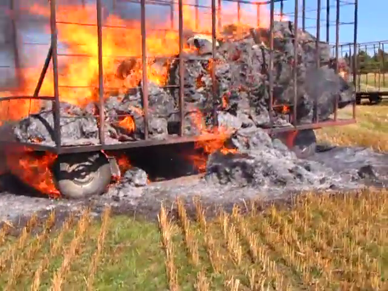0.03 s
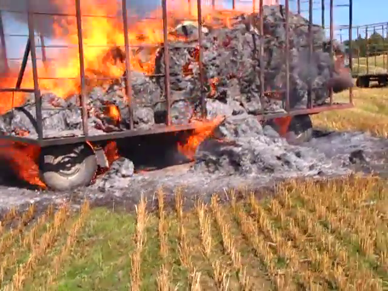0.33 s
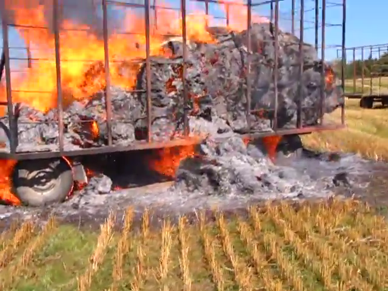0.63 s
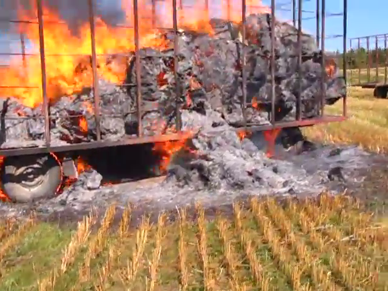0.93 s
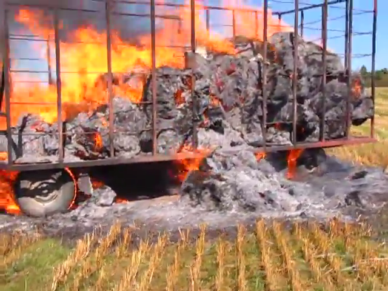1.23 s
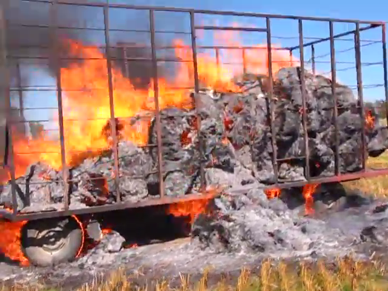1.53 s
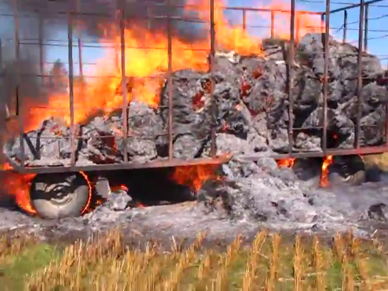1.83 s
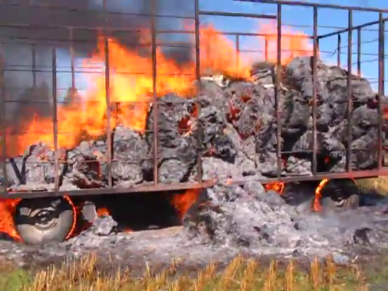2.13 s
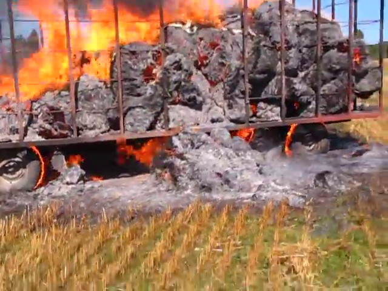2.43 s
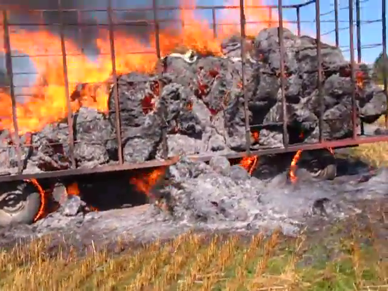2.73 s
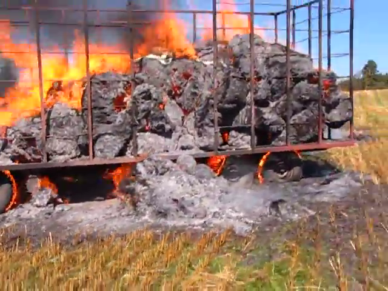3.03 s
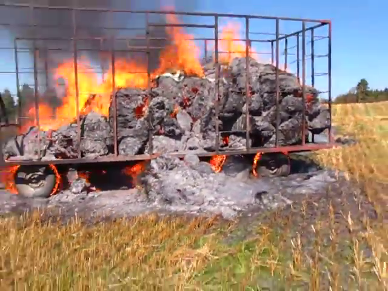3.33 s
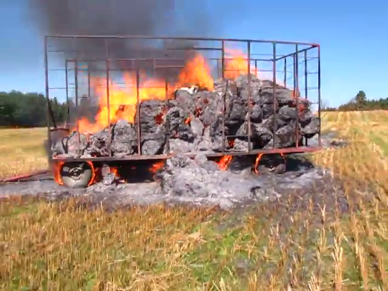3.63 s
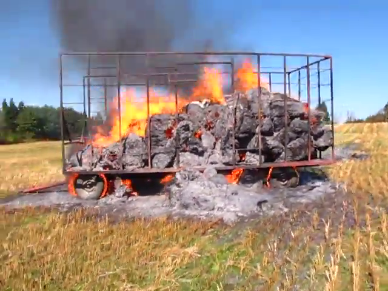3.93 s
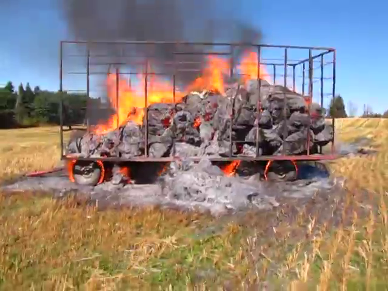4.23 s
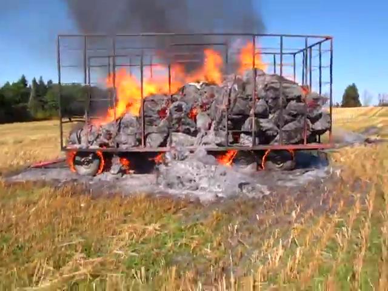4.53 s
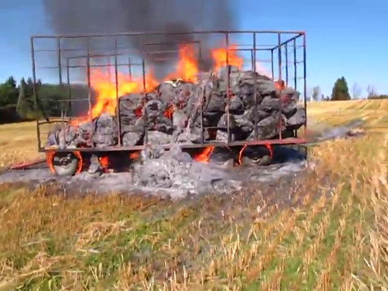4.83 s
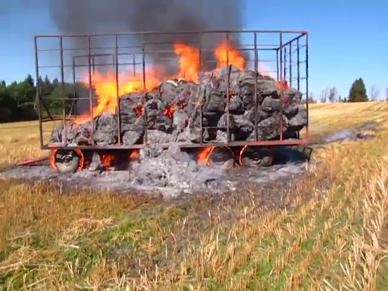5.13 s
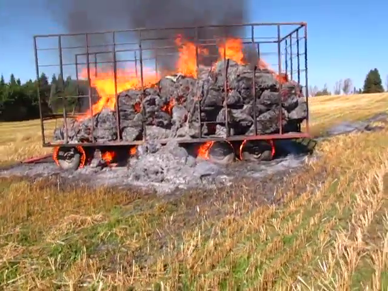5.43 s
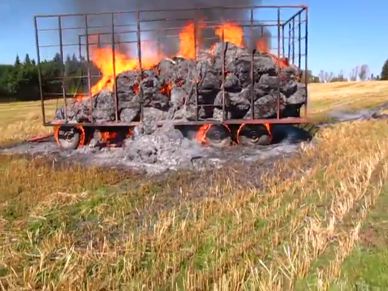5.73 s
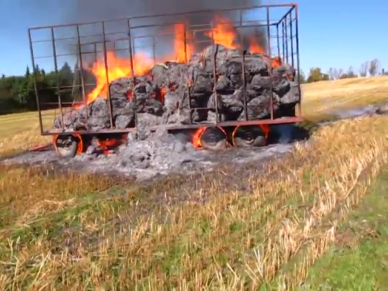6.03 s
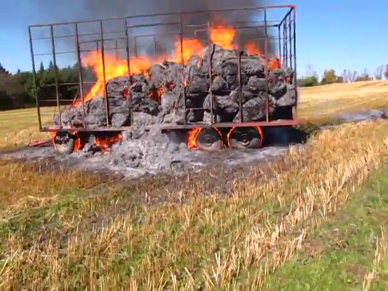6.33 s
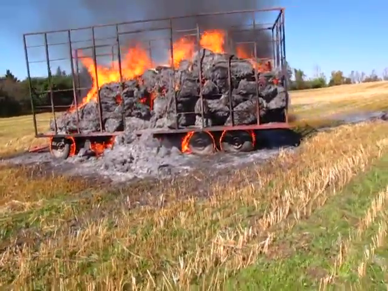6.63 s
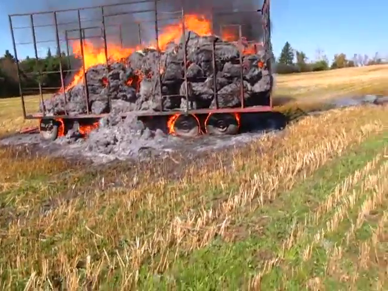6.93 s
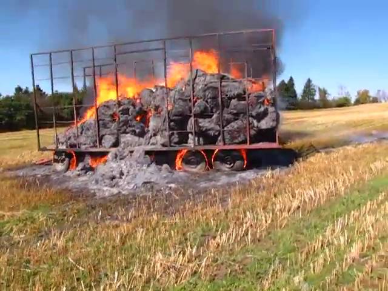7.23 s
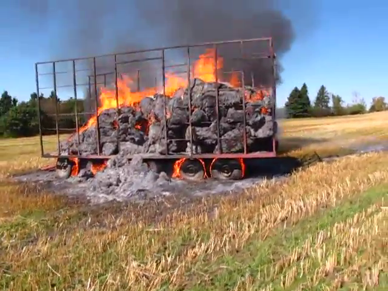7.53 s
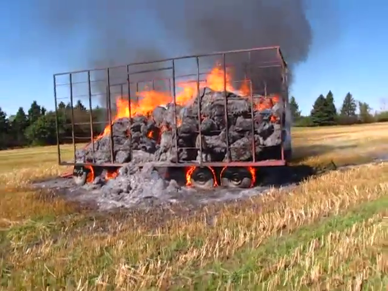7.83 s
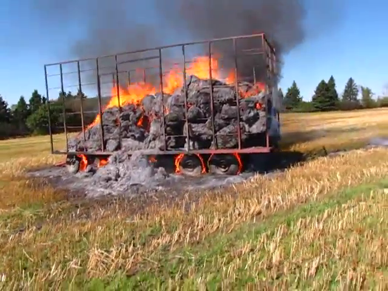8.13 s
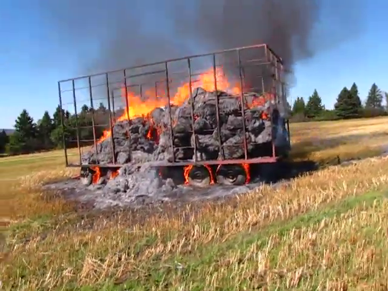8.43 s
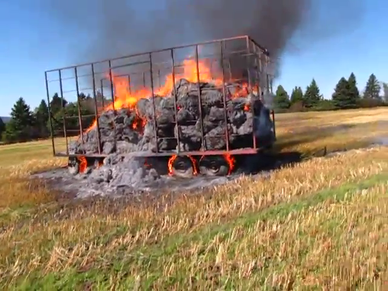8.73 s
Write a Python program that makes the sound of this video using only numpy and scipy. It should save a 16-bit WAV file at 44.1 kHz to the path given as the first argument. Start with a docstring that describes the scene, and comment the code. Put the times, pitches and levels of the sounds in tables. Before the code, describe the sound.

Straw bales burn a few metres away in an open field. For the whole nine seconds, fine crackle, flickering hiss and high sizzle sit over a low roar of flames, while bursting stalks give sharp, dry pops at uneven intervals. Strong pops come right at the start, near 1.8 seconds and at 2.4 seconds.

For the first four seconds, gusts buffet the microphone with a low flutter, mostly on the right, then die away. A few steps rustle and crunch through dry stubble until about 4.4 seconds, with a faint one near 7. Small muffled puffs come from inside the pile around 3.6, 6 and 7 seconds.

The fire flares at about 6 to 6.5 seconds, with more roar, sizzle and crackle, then sinks. The sharpest crack lands at 7.6 seconds, and slightly quieter burning with scattered pops continues to the end.

```python
"""Straw bales burn on a trailer in an open field, a few metres away.
Stalks burst in sharp pops that scatter among the bales, over fine crackle, the hiss of escaping gas
and the roar of the flames; the fire flares up once. The listener steps through the stubble.
Gusts buffet mostly the right microphone port for the first four seconds.
The loudest pops push the limiter down."""
import sys
import numpy as np
from scipy import signal
from scipy.io import wavfile
from scipy.ndimage import minimum_filter1d

SR = 44100
rng = np.random.default_rng(int(sys.argv[2]) if len(sys.argv) > 2 else 0)


def materialize(psi):
    """Save the field psi as 16-bit PCM at rate SR to the path in sys.argv[1].

    A 1-D psi becomes a single channel; in a 2-D psi each row is a channel.
    """
    bounded = np.clip(np.atleast_2d(psi).T, -1, 1)
    quanta = np.round(bounded * 32767).astype(np.int16)
    wavfile.write(sys.argv[1], SR, quanta)


N = 391608

# stereo image of fire and rustle: (frequency [Hz], left-right correlation [-])
LIKENESS = [(60, 0.97), (200, 1), (500, 0.98), (1300, 1), (3000, 0.35), (7000, 0.09), (15000, 0.11)]


def fire():
    """The blaze burns evenly, flares up and sinks as the listener backs away; crackle swells with it."""
    # relative levels: (time [s], roar [dB], hiss [dB], sizzle [dB])
    blaze = [(0.0, -54, -43.5, -51), (1.5, -49.5, -39.5, -49), (3.0, -52.5, -42.5, -49.5),
             (4.2, -51, -38.5, -49.5), (5.1, -51, -40.5, -47), (6.05, -48.5, -41, -43.5),
             (6.4, -46, -37, -40), (6.8, -53, -40.5, -44.5), (7.5, -54, -48, -45.5), (8.2, -56, -46, -48.5),
             (8.88, -54.5, -43.5, -51)]
    roar_db, hiss_db, sizzle_db = in_time(blaze)
    sputter_db = 2.5 * drift(130) + drift(9)
    roar = from_db(roar_db + 3) * flame_roar()
    hiss = from_db(hiss_db - 2.5 + sputter_db) * gas_hiss()
    sizzle = from_db(sizzle_db - 1 + sputter_db) * fine_sizzle()
    # bursts inside the flames arrive dull and smeared, those on the near face sharp and dry
    buried = from_db(roar_db - 5) * crackle(
        per_s=70, size_db=3.5, range_db=18.5, hz=(1250, 2600), clump_db=1.5, scatter_db=10, width=1,
        kinds=8)
    snaps = from_db(hiss_db - 0.5) * crackle(
        per_s=80, size_db=6, range_db=13, hz=(2800, 7000), clump_db=3, scatter_db=-4, width=0.65)
    ticks = from_db(sizzle_db - 3) * crackle(
        per_s=260, size_db=8, range_db=35, hz=(4530, 8800), clump_db=2, scatter_db=-9.5, width=1.54)
    lesser = from_db(hiss_db + 18) * lesser_pops()
    return roar + hiss + sizzle + buried + snaps + ticks + lesser + loud_pops() + thuds()


def loud_pops(pan_spread_db=2.26):
    """The loudest bursting stalks, each from its own place along the trailer."""
    # (time [s], direct level [dB], pitch [Hz], bandwidth / pitch [-], scatter re direct [dB])
    pops = [(0.0544, -8, 2200, 0.59, -13), (0.11, -24.5, 2680, 0.78, 3), (0.4714, -21, 6000, 2.2, -9),
            (0.5551, -13, 3350, 2.5, 8), (0.6444, -20.5, 5900, 2.1, -6), (0.7496, -25.5, 3900, 1, 9),
            (1.0436, -14, 4700, 1.44, -0.5), (1.406, -13.5, 4330, 1.05, 0), (1.5663, -14, 2800, .27, -9),
            (1.7178, -17, 5200, 1.2, -13), (1.7563, -8, 2970, 1.34, 0), (1.8787, -8, 4540, 1.16, 0),
            (2.0093, -17, 6700, 1.6, -17), (2.2731, -12.5, 2650, 0.86, -0.5), (2.3556, -3, 1680, 1.08, -8),
            (2.4919, -16.5, 4900, 0.93, -9), (2.694, -24, 3000, 1.5, -11), (2.7234, -21.5, 4700, 1.9, -5),
            (2.8774, -22.5, 2600, 1, 0), (2.8985, -22, 5600, 1.5, 0), (2.9157, -21.5, 3000, 2.9, 2.5),
            (2.9242, -20.5, 2600, 1.2, 4), (2.9729, -11, 2500, 1.2, -2), (3.128, -22, 4340, 1.9, 0),
            (3.231, -17.5, 4330, 1, -5), (3.3329, -23.5, 2270, 0.29, -13), (3.4717, -15.5, 4240, 1.5, 2),
            (3.6902, -17, 3730, 1.24, 2.5), (3.7847, -16.5, 2540, 2, -1), (3.841, -21.5, 2780, 0.46, -10),
            (4.161, -13.5, 7400, 1.54, -3.5), (4.194, -19, 4360, 0.54, -17),
            (4.4357, -10.5, 3250, 0.64, -8.5), (4.5364, -14.5, 3730, 1.9, -8), (4.678, -18, 3000, 3.3, -10),
            (4.9159, -17, 2600, 1.7, 0), (4.9484, -18.5, 2600, 0.73, -7), (5.1228, -15, 4930, 1.6, -18),
            (5.3237, -19, 3220, 1, -19), (5.6385, -13, 2480, 0.75, -9), (5.849, -27.5, 2280, 0.5, 7),
            (5.9647, -20.5, 6000, 6, -8), (5.9803, -16.5, 7160, 13, -17), (6.0416, -16.5, 3650, 1.6, -9),
            (6.1344, -29.5, 5600, 5.1, 11), (6.1893, -17, 4200, 4.6, -3.5), (6.3924, -19, 2600, 0.91, -4),
            (6.4537, -14, 4160, 2.2, -25), (6.505, -9.5, 5830, 1.4, -4), (6.5625, -16.5, 5530, 9.5, -28),
            (6.8497, -19.5, 5650, 1.3, -22), (6.9015, -24, 3470, 0.18, 2), (6.974, -12.5, 4430, 1.1, -7),
            (7.0881, -13.5, 2760, 0.71, -13), (7.177, -18, 8400, .7, -16), (7.3305, -11.5, 2600, 0.48, -12),
            (7.3763, -18.5, 2750, 1.3, -12), (7.389, -16, 3570, 2.5, -18), (7.494, -16, 6840, 0.75, -32),
            (7.5796, -1.5, 5100, 0.64, -41), (7.9612, -22, 4270, 1.3, -26), (8.0274, -31.5, 1590, 0.81, 2),
            (8.073, -29.5, 2400, 2.7, 11.5), (8.1069, -11.5, 2940, 0.53, -5.5),
            (8.191, -20, 6240, 1.5, -28), (8.3472, -17, 6000, 0.87, -12), (8.6282, -17, 3570, 1.2, 0),
            (8.677, -25, 2920, 0.28, 5.5)]
    out = np.zeros((2, N))
    for s, db, hz, width, scatter_db in pops:
        pan = from_db(pan_spread_db * rng.standard_normal() * np.array([[0.5], [-0.5]]))
        add(out, s, from_db(db) * pan * burst(hz, width, scatter_db))
    return out


def burst(hz, width, scatter_db, scatter_t60_s=0.027, lumpy_db=5, ground_db=-11):
    """One pop: a direct pulse, its bounce off the ground and a spray of reflections from the bales."""
    t = np.arange(SR // 20) / SR
    kick = np.zeros((2, len(t)))
    kick[[0, 1], rng.integers(0, 2, 2)] = 1  # reaches either port up to a sample sooner
    bounce_samples = rng.integers(SR // 4000, SR // 800)
    kick = kick + from_db(ground_db) * np.roll(kick, bounce_samples, axis=1)
    mid, side, lumps = rng.standard_normal((3, len(t)))
    fade = from_db(-60 * t / scatter_t60_s + lumpy_db * lumps)
    onset = np.clip(t / 0.00032 - 1, 0, 1)
    reflections = (mid + 0.31 * side * [[1], [-1]]) * fade * onset
    direct = unit_energy(stalk(kick, hz, width))
    scattered = unit_energy(stalk(reflections, hz, width))
    return direct + from_db(scatter_db) * scattered


def stalk(kick, hz, width):
    """A splitting stalk rings briefly: woody if hollow (small width), broad if it shatters."""
    w = 2 * np.pi * min(hz, SR / 3) / SR
    damping = np.sin(w) * width / 2
    ring = signal.lfilter([damping, 0, -damping], [1 + damping, -2 * np.cos(w), 1 - damping], kick)
    ring = butter(ring, hz * (0.77 + width), "low", order=3)
    # a source this small radiates little bass; the thinner, the less
    return butter(ring, max(850, 0.19 * hz), "high")


def lesser_pops(per_s=6, spread_db=2.8, thick_hz=3170, thin_hz=6500):
    """Single stalks burst at uneven intervals; thinner ones sound higher, broader and drier."""
    out = np.zeros((2, N))
    for k, (late, thin, strong) in enumerate(rng.random((int(per_s * N / SR), 3))):
        hz = thick_hz * (thin_hz / thick_hz) ** thin
        pop = burst(hz, width=0.86 + 1.54 * thin, scatter_db=-12 * thin)
        add(out, (k + late) / per_s, from_db(spread_db * (2 * strong - 1.5)) * pop)
    return out


def crackle(per_s, size_db, range_db, hz, clump_db, scatter_db, width, kinds=14):
    """Clusters of small bursts from many kinds of stalk; most are weak, a few strong."""
    onsets = np.flatnonzero(rng.random(N) < per_s * from_db(clump_db * drift(14)) / SR)
    level_db = range_db * np.tanh(size_db * rng.exponential(1, N) / range_db)
    sizes = from_db(level_db) * rng.choice([-1, 1], N)
    kind = rng.integers(0, kinds, N)
    out = 0
    for k, pitch_hz in enumerate(np.geomspace(*hz, kinds)):
        hits = onsets[kind[onsets] == k]
        kicks = np.zeros((1, N))
        kicks[0, hits] = sizes[hits]
        pop = burst(pitch_hz, width * 2 ** rng.uniform(-0.69, 1), scatter_db + 4 * rng.standard_normal())
        out = out + signal.oaconvolve(kicks, pop, axes=1)[:, :N]
    return out


def thuds(edge_ratio=1.44, pan_db=1.5):
    """Bursts muffled deep in the pile: short, low puffs, a little to the right."""
    # (time [s], level [dB], pitch [Hz], t60 [s])
    puffs = [(3.607, -15.5, 860, .034), (3.615, -20, 940, 0.07), (3.732, -23.5, 650, 0.064),
             (6.045, -23.5, 276, 0.12), (6.975, -24.5, 720, 0.058)]
    out = np.zeros((2, N))
    t = np.arange(SR // 8) / SR
    for s, db, hz, t60_s in puffs:
        noise = butter(rng.standard_normal(len(t)), [hz / edge_ratio, hz * edge_ratio], "band")
        add(out, s, from_db(db) * unit_energy(noise * from_db(-60 * t / t60_s)))
    return out * from_db([[-pan_db], [pan_db]])


def gas_hiss():
    """Gas escapes from the straw with a fast-flickering hiss."""
    # (frequency [Hz], relative density [dB])
    spectrum = [(600, -51), (1200, -57), (1700, -5), (2800, 1.5), (5000, 3), (7000, -16), (10000, 11),
                (16000, -50)]
    return turbulence(spectrum, patchy_db=2.3, flicker_hz=160)


def fine_sizzle():
    """The burning straw sizzles in the high treble."""
    # (frequency [Hz], relative density [dB])
    spectrum = [(3000, -31), (6000, 1.5), (8000, -26.5), (10000, -20), (12500, -9.5), (16000, -44)]
    return turbulence(spectrum, patchy_db=2.5, flicker_hz=50)


def flame_roar():
    """Turbulent flames roar in the bass and middle."""
    # (frequency [Hz], relative density [dB])
    spectrum = [(25, -2), (60, 0.5), (140, 2), (300, -1), (600, -3), (1000, -5.5), (1500, -6),
                (2200, -32.5), (4000, -50)]
    return turbulence(spectrum, patchy_db=2.5, flicker_hz=69)


def footsteps():
    """Each step presses the stubble down with a soft rustle and snaps many dry stalks."""
    # (time [s], length [s], rustle [dB], crunch [dB])
    steps = [(0.248, 0.053, -43.5, -47), (0.394, 0.021, -48, -32.5), (0.794, 0.075, -43.5, -34),
             (1.318, 0.14, -44.5, -43), (2.887, 0.03, -48, -36.5), (3.687, 0.097, -42, -42),
             (4.19, 0.22, -47, -51.5), (6.95, .2, -49.5, -67)]
    # (frequency [Hz], relative density [dB])
    rustle_spectrum = [(300, -16), (600, 4.5), (1000, 1.5), (1600, -0.5), (2500, -5), (4000, -22)]
    rustle = turbulence(rustle_spectrum, patchy_db=3, flicker_hz=40)
    crunch = rms_one(crackle(
        per_s=260, size_db=5, range_db=12, hz=(2800, 7000), clump_db=1, scatter_db=-6, width=1.2,
        kinds=6))
    out = np.zeros((2, N))
    for s, length_s, rustle_db, crunch_db in steps:
        press = swell(s, length_s, attack_s=0.024, release_s=0.038)
        out += press * (from_db(rustle_db) * rustle + from_db(crunch_db) * crunch)
    return out


def wind(gain_db=-1.3, lumpy_db=4.04, strong_gust_db=-30, split_hz=220):
    """Each port catches its own eddies: the left rumbles, the right flutters higher."""
    # buffeting at each port: (frequency [Hz], relative density [dB])
    left_spectrum = [(20, 9), (50, 7), (90, 0), (150, 8), (240, -32), (350, -11), (700, -42), (1500, -50)]
    right_spectrum = [(20, -37), (40, -8), (85, 0), (150, 1), (235, -3.5), (330, -13), (480, -20.5),
                      (1500, -84)]
    # (time [s], length [s], left [dB], right [dB])
    gusts = [(0.0, 0.23, -48, -38), (0.322, 0.073, -35, -33), (0.474, .1, -50, -31),
             (0.7, 0.13, -50, -39.5), (0.96, 0.4, -60, -34), (1.474, 0.027, -62, -37.5),
             (1.66, 0.29, -52, -32), (2.138, 0.17, -53, -27), (2.617, 0.079, -63, -45),
             (2.822, 0.26, -55, -32), (3.3, 0.28, -51, -37), (3.74, 0.052, -62, -37),
             (3.938, 0.17, -52, -38)]
    # light air, dying away: (time [s], level [dB])
    breeze = [(0.0, -54), (4.2, -56), (4.7, -62.5), (8.88, -75)]
    eddies = np.array([turbulence(spectrum, patchy_db=1.76, flicker_hz=36, likeness=[(100, 0)])[0]
                       for spectrum in (left_spectrum, right_spectrum)])
    force = from_db(in_time(breeze))
    for s, length_s, left_db, right_db in gusts:
        gust = swell(s, length_s, attack_s=0.073, release_s=0.082)
        force = np.hypot(force, from_db([[left_db], [right_db]]) * gust)
    wind_db = 20 * np.log10(force)
    # a strong gust sheds smaller eddies and sounds higher
    tilt_db = 0.99 * np.maximum(wind_db - strong_gust_db, 0)
    large = butter(eddies, split_hz, "low", order=1)
    buffet = from_db(-tilt_db) * large + from_db(tilt_db) * (eddies - large)
    return from_db(wind_db + gain_db + lumpy_db * drift(22)) * buffet


def turbulence(spectrum, patchy_db, flicker_hz, likeness=LIKENESS):
    """Half-octave bands of stereo noise, each flickering on its own; rms 1."""
    white = rng.standard_normal((2, 2, N))
    edges_hz = 20 * 2 ** np.arange(0, 10.1, 0.5)
    out = 0
    for k, (low, high) in enumerate(zip(edges_hz, edges_hz[1:])):
        if high < spectrum[0][0] or low > spectrum[-1][0]:
            continue
        hz = np.sqrt(low * high)
        mid, side = butter(white[k % 2], [low, high], "band")
        alike = at_hz(likeness, hz)
        gain = from_db(at_hz(spectrum, hz) + patchy_db * drift(flicker_hz))
        out = out + gain * (np.sqrt(1 + alike) * mid + np.sqrt(1 - alike) * side * [[1], [-1]])
    return rms_one(out)


def drift(corner_hz, hop=20):
    """Smooth random wander, rms about 1."""
    pole = np.exp(-2 * np.pi * corner_hz * hop / SR)
    noise = rng.standard_normal(N // hop + 4002)
    slow = signal.lfilter([1], [1, -2 * pole, pole * pole], noise)[4000:]
    return np.interp(np.arange(N) / hop, np.arange(len(slow)), rms_one(slow))


def swell(start_s, length_s, attack_s, release_s):
    """Rises to 1 by the start, holds for the length, dies away."""
    t = np.arange(N) / SR - start_s
    rise = np.minimum(t, 0) / attack_s
    fall = np.maximum(t - length_s, 0) / release_s
    return np.exp(-np.minimum(rise ** 2 + fall ** 2, 20))


def from_db(db):
    return 10 ** (np.asarray(db) / 20)


def rms_one(x):
    return x / np.sqrt(np.mean(x ** 2) + 1e-20)


def unit_energy(x):
    """Scales each channel to the energy of 1 ms at rms 1."""
    return x * np.sqrt(SR / 1000 / np.sum(x ** 2, axis=-1, keepdims=True))


def in_time(rows):
    """Each column of a curve at every sample."""
    s, *columns = np.transpose(rows)
    return [np.interp(np.arange(N) / SR, s, column) for column in columns]


def at_hz(points, hz):
    """Reads a curve on a log-frequency axis."""
    points_hz, values = np.transpose(points)
    return np.interp(np.log(hz), np.log(points_hz), values)


def butter(x, hz, kind, order=2):
    sos = signal.butter(order, np.clip(hz, 10, 0.45 * SR), kind, fs=SR, output="sos")
    return signal.sosfilt(sos, x)


def add(out, start_s, sound):
    i = round(start_s * SR)
    out[:, i:i + sound.shape[-1]] += sound[..., :max(N - i, 0)]


def ports(x, left_hz=(2500, 8000), right_hz=(1900, 3050)):
    """Port resonances: the left favours the treble, the right the upper middle."""
    lean = 0.31 * butter(x, left_hz, "band", order=1) - 0.43 * butter(x, right_hz, "band", order=1)
    return x + lean * [[1], [-1]]


def limiter(x, ceiling_db=1.5, release_db_per_s=26):
    """A peak over the ceiling pulls the gain down at once; it recovers slowly."""
    peak_db = 20 * np.log10(np.abs(x).max(axis=0) + 1e-9)
    over_db = np.maximum(peak_db - ceiling_db, 0)
    ahead_db = -minimum_filter1d(-over_db, size=65)
    recovery_db = release_db_per_s * np.arange(N) / SR
    return x * from_db(recovery_db - np.maximum.accumulate(ahead_db + recovery_db))


def scene():
    return fire() + footsteps() + wind()


def record(dry):
    """Port colour, limiter, steep low-pass."""
    cutoff_hz = 16200
    lowpass = signal.ellip(10, 0.1, 80, cutoff_hz, fs=SR, output="sos")
    return signal.sosfilt(lowpass, limiter(ports(dry)))


dry = scene()
out = record(dry)
materialize(out)
```